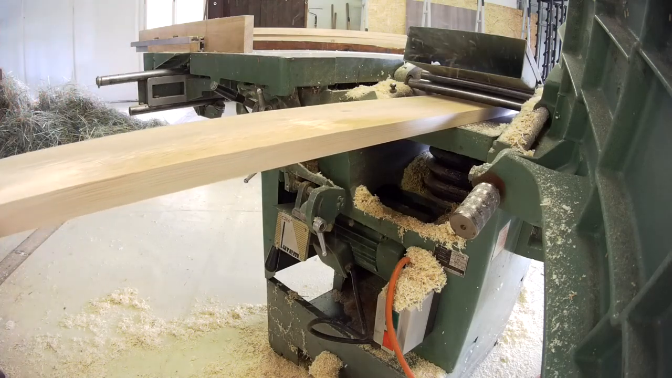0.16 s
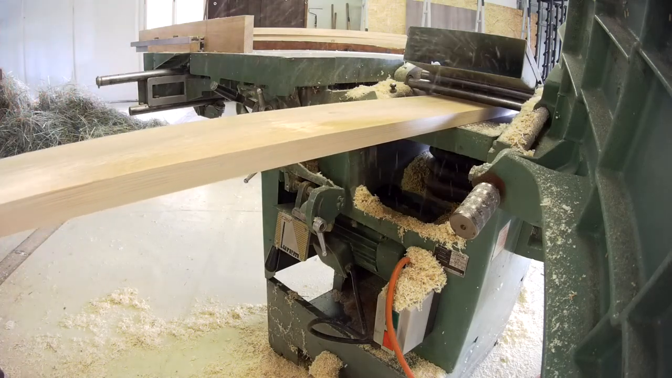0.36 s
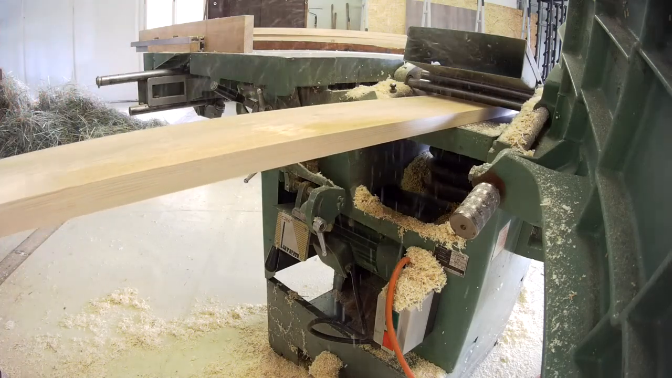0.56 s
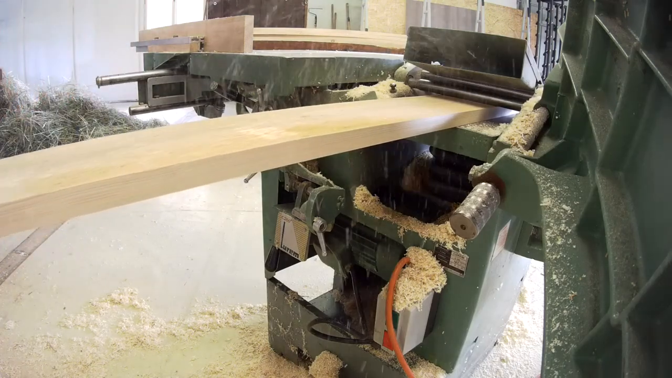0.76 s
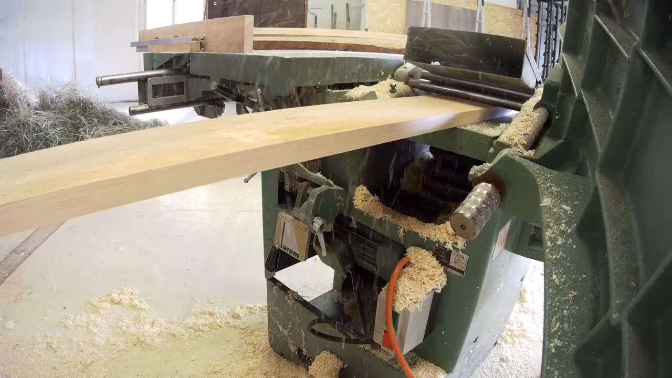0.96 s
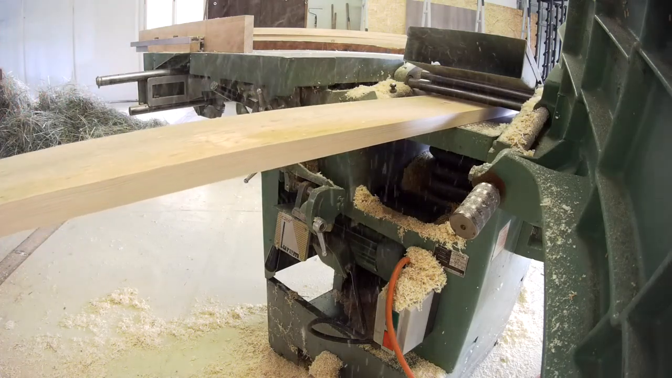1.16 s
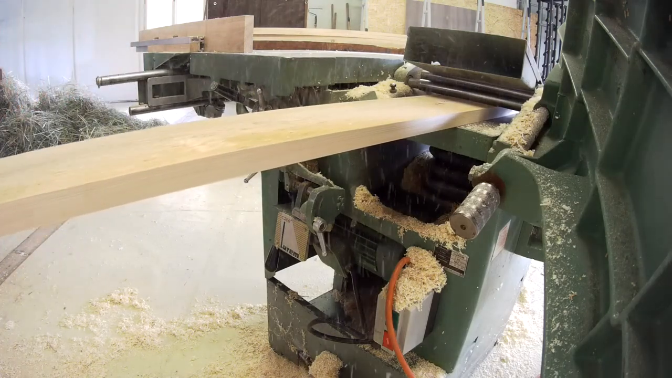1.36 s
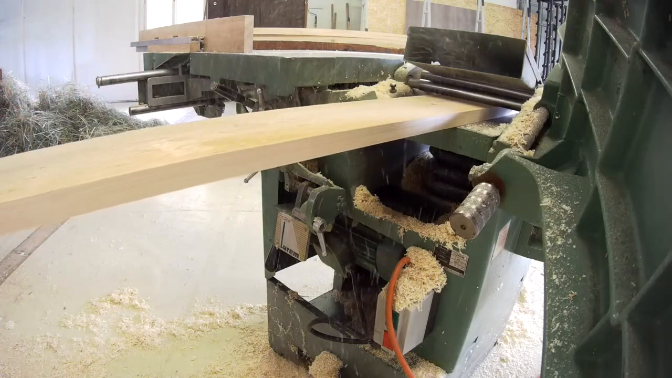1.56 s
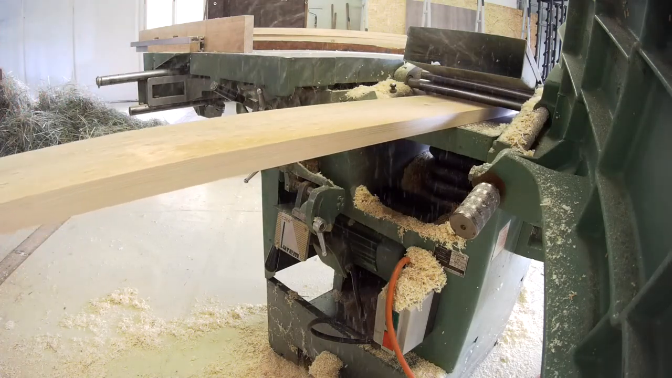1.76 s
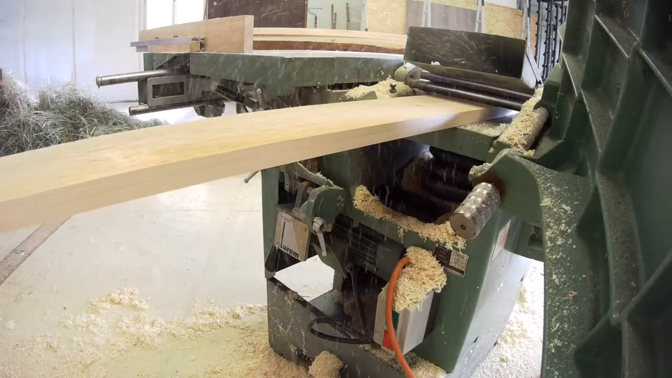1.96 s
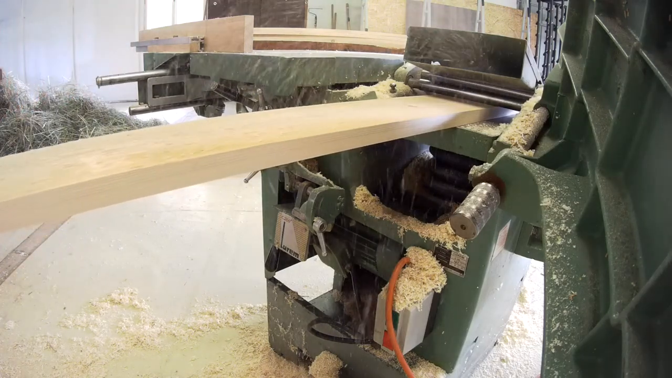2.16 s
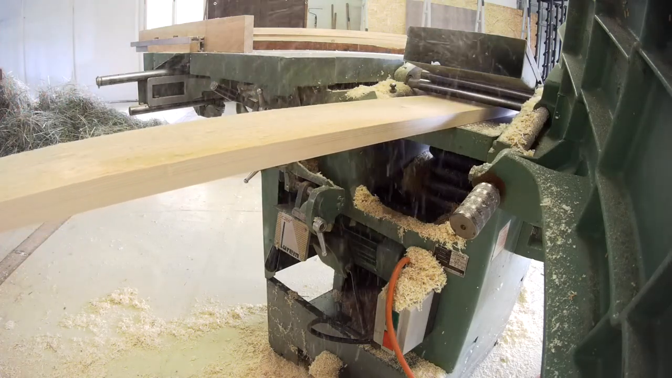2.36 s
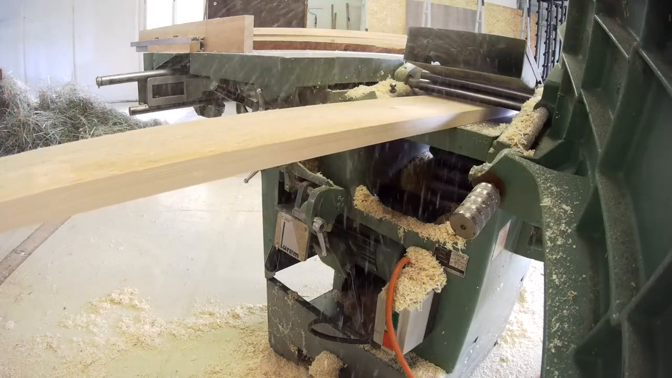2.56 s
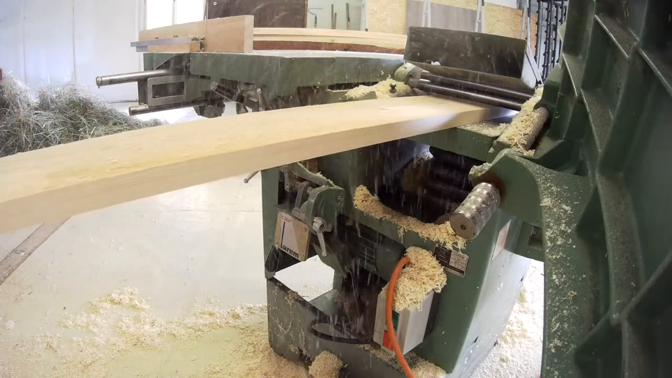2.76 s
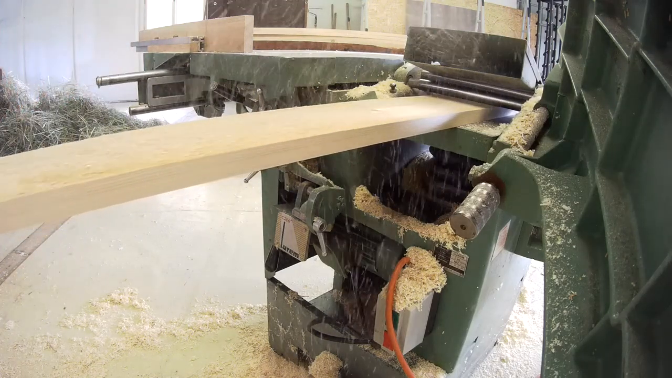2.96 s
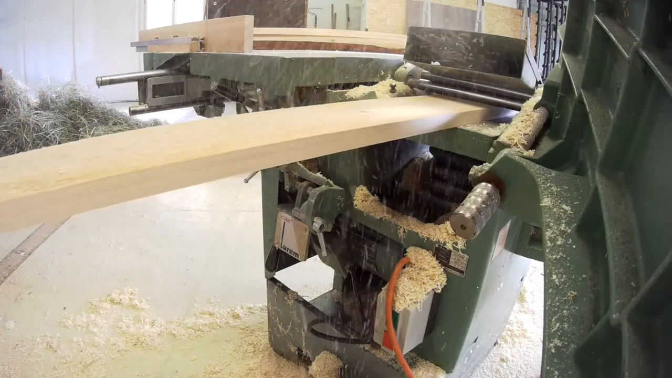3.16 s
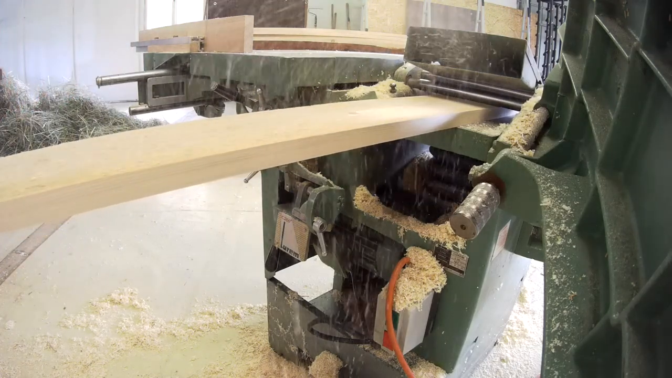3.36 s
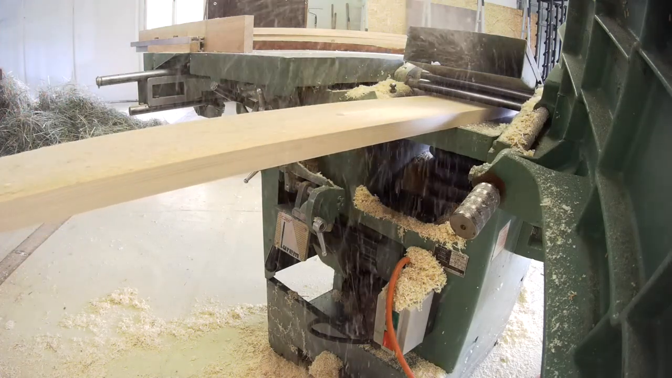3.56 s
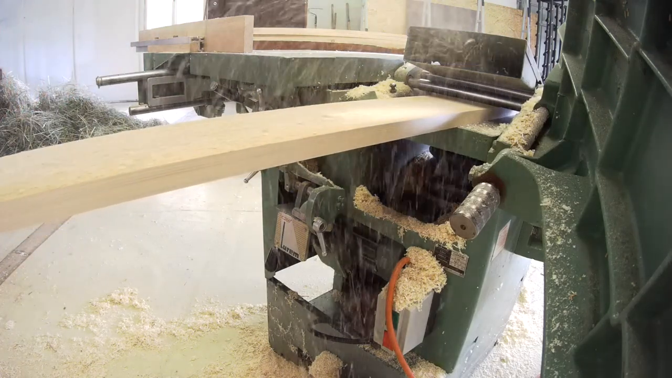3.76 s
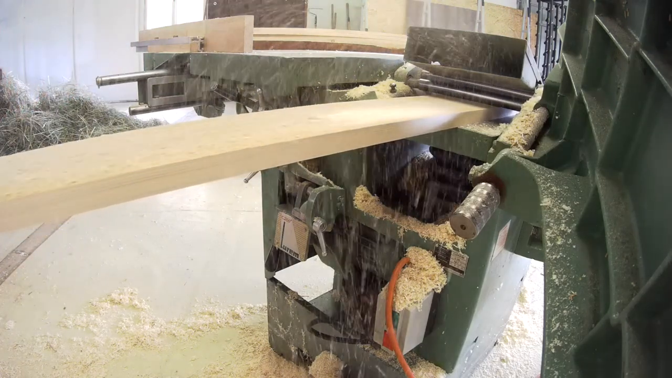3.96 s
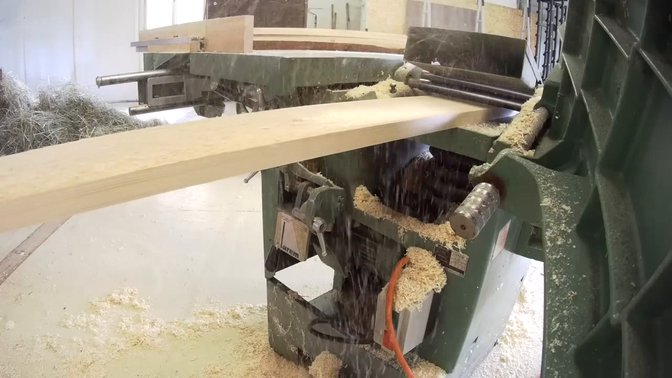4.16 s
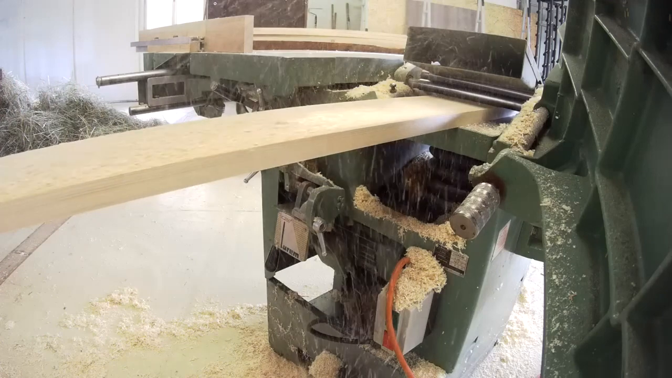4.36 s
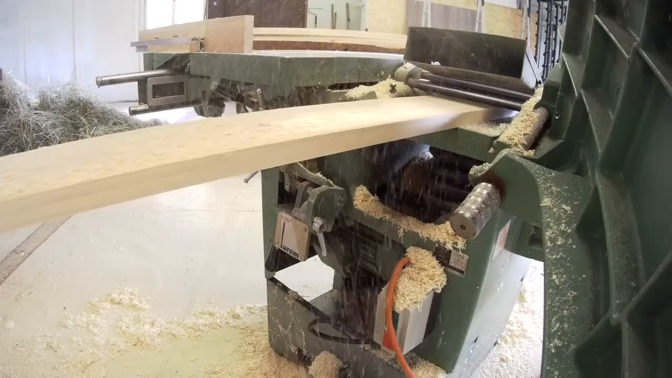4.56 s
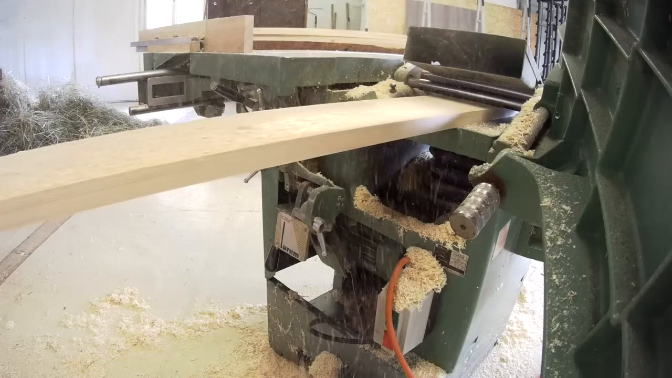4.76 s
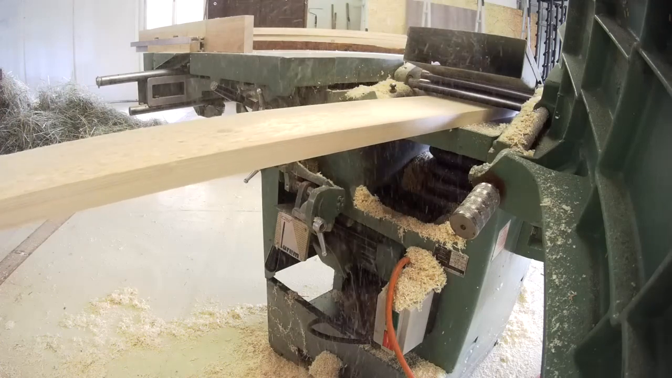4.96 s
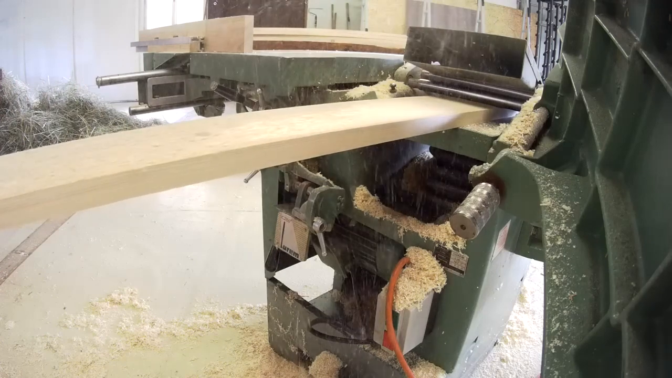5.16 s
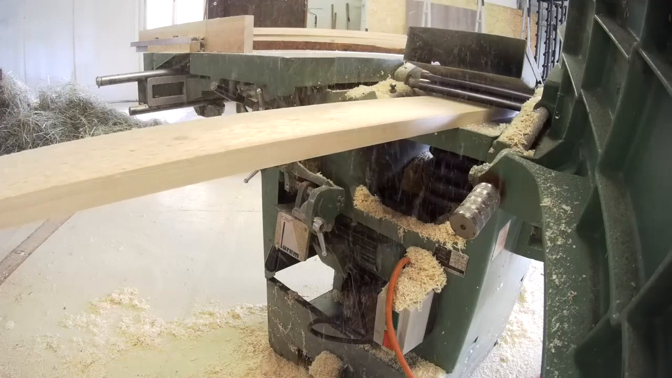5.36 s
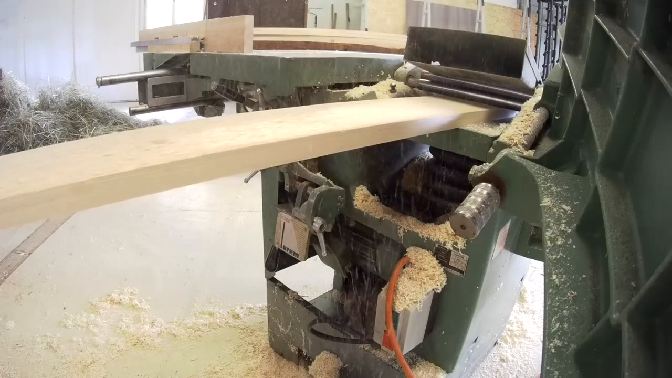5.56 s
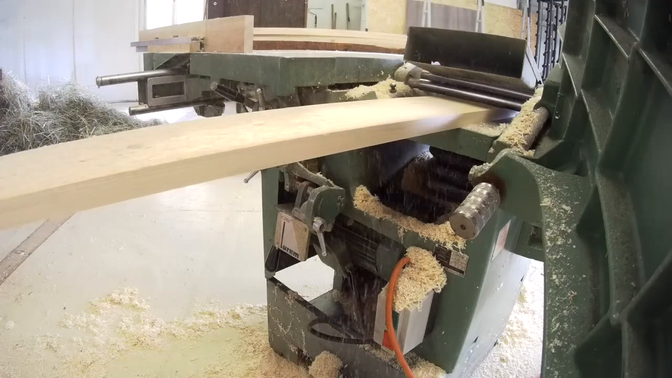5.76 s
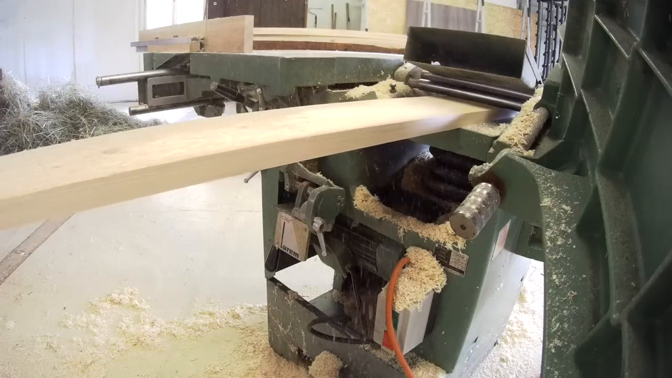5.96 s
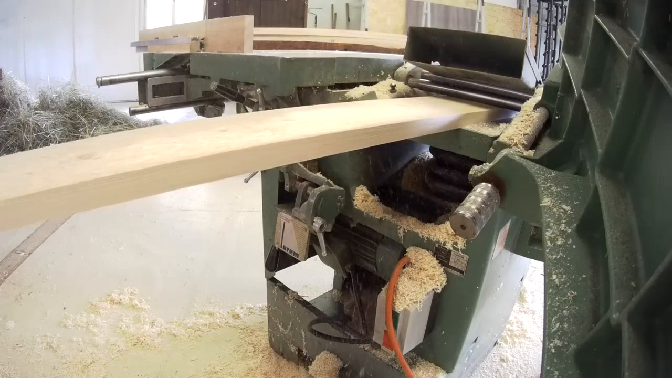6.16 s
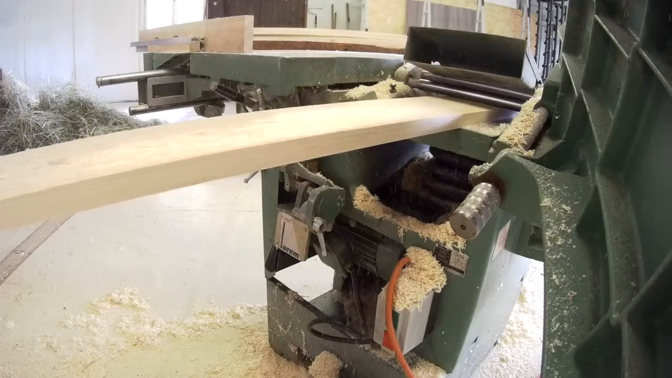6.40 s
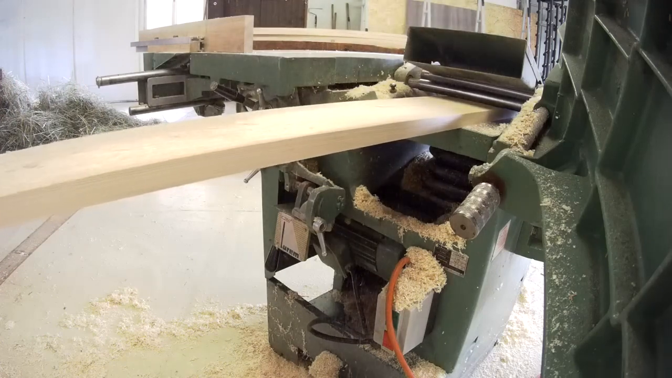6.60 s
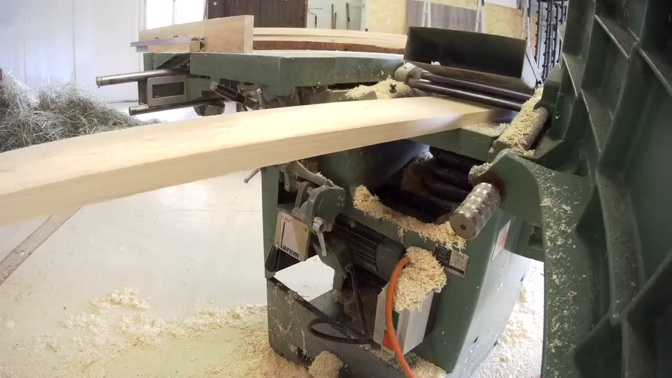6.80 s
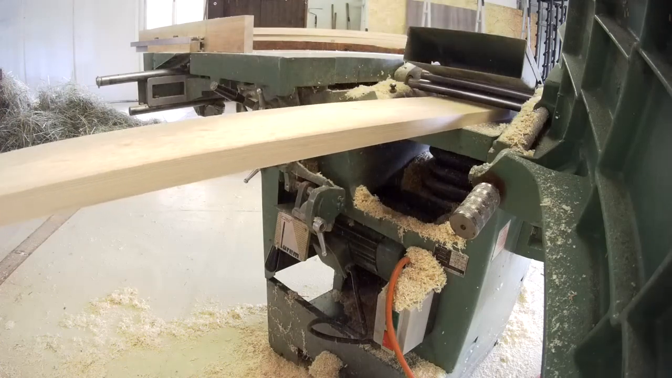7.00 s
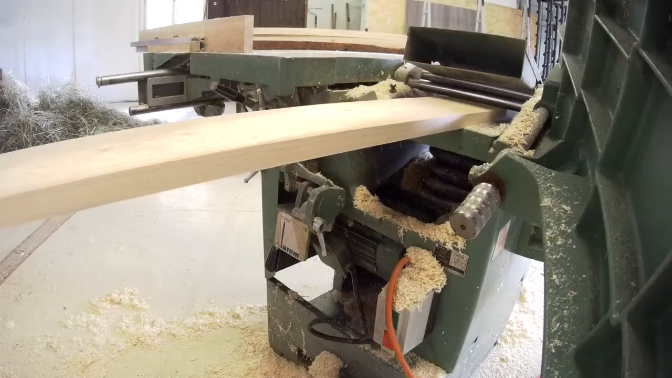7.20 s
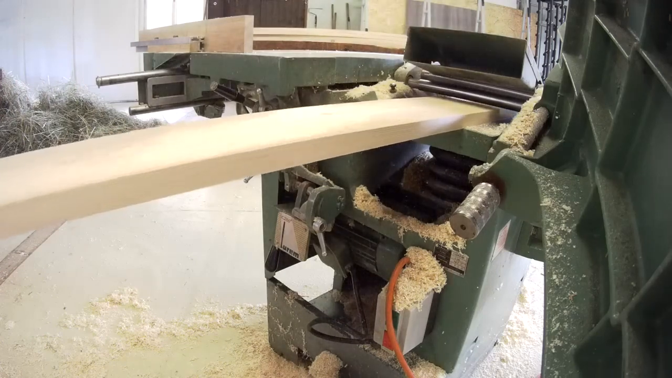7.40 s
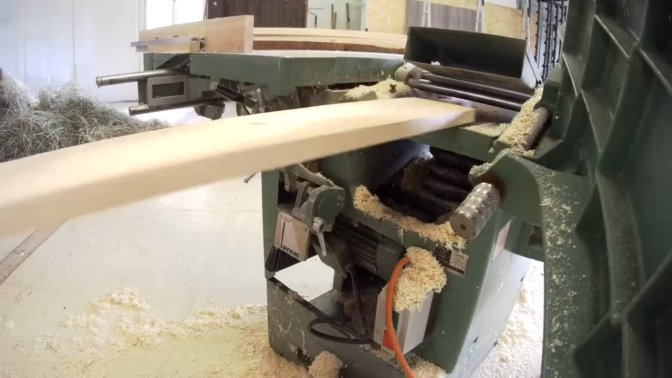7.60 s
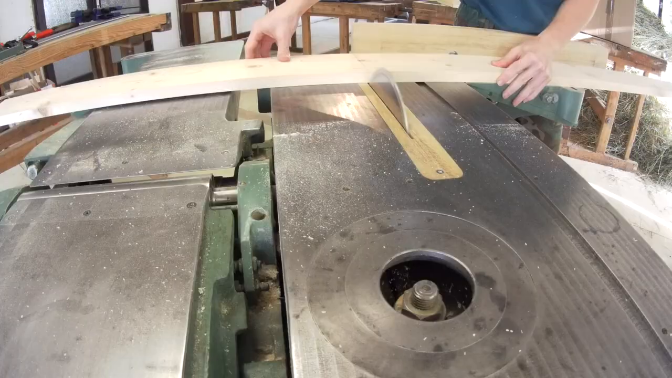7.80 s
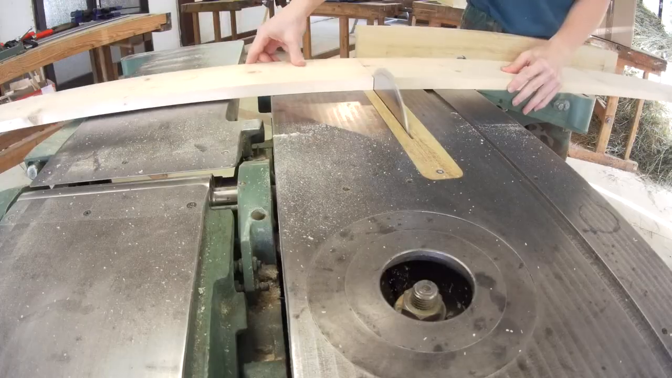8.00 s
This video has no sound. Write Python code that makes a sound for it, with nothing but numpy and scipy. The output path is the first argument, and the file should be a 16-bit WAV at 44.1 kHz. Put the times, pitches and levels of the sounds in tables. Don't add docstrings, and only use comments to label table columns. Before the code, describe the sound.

A thickness planer drones thick and rough as its spinning cutter chews a board, chips hissing, then the cut runs out and it whirs on freely.

```python
import sys
import numpy as np
from scipy import signal
from scipy.io import wavfile
from scipy.ndimage import uniform_filter1d

SR = 44100
rng = np.random.default_rng(int(sys.argv[2]) if len(sys.argv) > 2 else 0)


def waveform_to_disk(signal):
    frames = np.transpose(np.atleast_2d(signal))
    scaled = np.clip(frames, -1, 1) * 32767
    samples = np.round(scaled).astype(np.int16)
    wavfile.write(sys.argv[1], SR, samples)


def ratio(d):
    e = np.asarray(d, float) / 20
    return 10 ** e


N = 354560

# f/Hz, level/dB per Hz
WIND = [(15, -32), (35, -23), (75, -27.5), (150, -10), (300, -9), (550, -4), (1000, -3.5), (1500, -5.5),
        (2200, -8.5), (2800, -21), (5000, -17), (8500, -33.5), (12000, -43), (14500, -36.5)]
# f/Hz, level/dB
HUMS = [(48.4, -58), (145, -63), (393, -58), (490, -54), (1340, -50), (1117, -52), (1980, -52)]
# f/Hz, width/Hz, level/dB
BELT_RINGS = [(942, 140, -42.5), (1023, 55, -38.5), (2108, 170, -45.5), (3055, 150, -52.5),
              (4063, 240, -50), (4290, 320, -55), (4946, 330, -64), (5190, 34, -58.5), (5490, 250, -58),
              (6453, 680, -53), (7830, 580, -53.5), (9105, 200, -55), (1090, 40, -49), (975, 25, -50)]
# f/Hz, level/dB per Hz
CHIP_HISS = [(300, 2), (800, -74), (2000, -21), (4200, 3), (7000, .5), (10000, -3), (14000, -45.5)]
# t/s, level/dB
DEPTH = [(0.0, -57), (0.02, -60), (0.3, -56), (1.37, -57), (1.96, -54.5), (2.18, -55), (2.26, -55),
         (2.87, -56), (3.38, -54), (4.68, -58), (4.85, -52.5), (6.03, -64.5), (7.75, -64.5), (7.82, -61.5)]
# t/s, turns f/Hz
SPEED = [(0, 115.28), (0.3, 115.11), (0.9, 115.11), (1.2, 115.24), (2.1, 114.98), (3, 114.95),
         (3.3, 114.81), (3.6, 114.4), (3.9, 115.02), (4.5, 115.32), (4.8, 115.22), (5.1, 115.28),
         (5.7, 115.6), (6.9, 115.77), (7.83, 115.73)]
# level in the cut/dB, running free/dB, change t/s
KNIFE_TONES = [(-34.5, -36.5, 0.19), (-34.5, -36, 0.26), (-33, -35.5, 0.23), (-28.5, -49, 1.95),
               (-40, -55, 0.46)]
SWELL_ORDERS = (1, 18, 21, 33, 36)
# level in the cut/dB, running free/dB, change t/s
SWELL_TONES = [(-55, -54, 0.41), (-44.5, -50, .9), (-45.5, -60.5, 0.26), (-42, -76, 0.22),
               (-41.5, -52, 0.26)]
UNBALANCE_ORDERS = (2, 4, 5, 7, 8, 10, 11, 17)
# level in the cut/dB, running free/dB, change t/s
UNBALANCE = [(-50.5, -53.5, .5), (-48.5, -46.5, .5), (-47.5, -49.5, .5), (-42, -46.5, .5), (-49, -47, .5),
             (-53.5, -63, .5), (-51, -81, .5), (-46.5, -46.5, .5)]
# f/Hz, level of a line/dB
BITE = [(1500, -51), (2300, -50), (2600, -55), (2880, -58), (3020, -54), (3300, -57), (3700, -52.5),
        (4000, -48), (4300, -50), (4700, -55), (5400, -56), (6000, -60), (6600, -60), (7300, -67)]
BITE_STARTS = (13, 26, 40, 51, 72)
# level in the cut/dB, running free/dB, change t/s
BITE_REGIONS = [(0.5, -7.5, 0.18), (3, -12, 0.083), (-2.5, -21, 0.65), (0.2, -11.5, 0.26)]
# t/s, length/s, f/Hz, lift level/dB
BOARD = [(0.05, 1.3, 4840, -3), (0.15, 0.31, 2360, -27), (0.4, 0.37, 3440, 8.5), (0.4, 0.27, 3850, -3),
         (0.45, 0.83, 5120, 8.5), (0.55, 0.4, 5460, -7.5), (0.75, 0.28, 2820, 8.5),
         (0.8, 0.55, 6760, -11.5), (0.95, 1.84, 3100, -4), (1.5, 1.5, 2344, 9.5), (1.8, 0.27, 5423, 12),
         (1.8, 0.22, 3950, -14.5), (1.8, 1.5, 1956, 6), (2.35, 0.21, 4980, 15), (2.55, 0.27, 5640, -16.5),
         (2.65, 0.27, 2220, 8.9), (2.65, 0.27, 2470, -10), (3.2, 0.19, 4600, 9), (3.85, 1.3, 4797, -9.5),
         (4.0, 1.3, 4490, -4), (4.1, 1.1, 2946, -11), (4.35, 2.1, 2650, -13), (4.5, 0.99, 2160, -9.5),
         (4.55, 0.72, 4130, 4.5), (4.8, 0.44, 2470, -10.6), (5.05, 0.74, 6640, -20),
         (6.25, 1.3, 1940, -12.5), (6.3, 0.9, 4180, -7.5)]
# t/s, length/s, f/Hz, lift level/dB
HOOD = [(0.05, 0.32, 1038, -3), (0.05, 0.4, 1499, -14), (0.55, 0.23, 1844, -13), (0.9, 0.14, 1700, -5),
        (1.05, 1.3, 1250, 9), (1.25, 0.24, 1520, 11.5), (1.25, 0.4, 576, 5.5), (1.3, 0.26, 1268, -15),
        (1.3, 1.04, 115, 5.5), (1.5, 0.43, 692, 3), (1.7, 0.34, 1833, -16), (2.25, 1.4, 1614, 8.8),
        (2.6, 2.1, 1153, 7.5), (2.8, 0.44, 1729, -6), (3.0, 0.36, 346, -4), (3.0, 1.2, 692, -4),
        (3.0, 1.1, 917, 6.5), (3.2, 0.74, 1038, 5), (4.45, 0.4, 1038, -3), (4.65, 0.95, 1480, -3),
        (5.05, 1, 1850, -17), (5.2, 0.28, 113.4, -14), (5.4, 0.29, 922, -7), (5.5, 1.3, 1729, 3),
        (6.4, 0.4, 680, -12), (6.75, 0.27, 1038, 4.5), (7.25, 0.27, 692, 3), (7.65, 0.17, 1038, -5.6)]
# t/s, length/s, f/Hz, lift level/dB
LIFTS_AND_DIPS = [(3.6, 0.083, 1383, -8), (3.63, 0.036, 1729, 8), (3.65, 0.11, 346, 2.5), (3.75, 0.049, 692, 5),
                  (8.1, 0.11, 346, 4), (6.7, 0.16, 1383, -5), (7, .2, 346, -1.5), (5.25, 0.18, 6900, 13.5),
                  (1.32, .6, 346, 2), (0.32, 0.37, 2190, -7), (1.6, 1, 2997, 7), (2.05, 0.14, 6570, 12),
                  (3.3, .27, 3458, -8), (3.75, .18, 3900, 7.5), (3.85, .18, 4300, -10), (3.3, 0.34, 6500, 7.5),
                  (6.75, 0.069, 692, -6), (7.9, .9, 2075, -11), (.55, .15, 1383, 2), (3.3, .35, 3950, 8),
                  (.05, 0.11, 346, -4.5), (4.95, .4, 5350, 11), (3.8, .1, 2075, 5.5), (.8, 0.14, 1038, 2.5),
                  (2.6, 0.32, 115, -9.5)]
# lower edge f/Hz, most peakiness that passes as noise
NOISY_TREBLE = [(4600, .45), (5100, .36), (5600, .58), (6200, 0.52), (6800, 0.67), (7500, 0.66),
                (8200, 1.1), (9000, 0.83), (9700, 1.2), (11000, 1.3), (12000, 1.3), (12750, 1.3),
                (13500, 1.3), (14250, 1.3)]
# lower edge f/Hz, least level against the usual/dB
TOP_BANDS = [(12750, -9), (13500, -1.5), (14250, 4), (14500, 9), (15200, 99)]

KNIVES, PULLEY_COGS, BELT_COGS = 3, 9, 81
RIPPLE_TURNS, BELT_SLIP = .0012, .0045
CUT_ENDS_S = 5.337
WIND_DB = -38.5
HISS_DB, HISS_FOLLOWS, USUAL_DEPTH_DB = -50, 1.2, -58.5
BITE_WANDER_DB = 1.0
HOOD_WIDTH, BOARD_WIDTH = .03, .04
OVERLOAD, OFFSET, KNEE = .106, .0005, 7
END_S, FADE_S = 7.8342, .0006


def rms_one(x):
    return x / np.sqrt(np.mean(x ** 2) + 1e-20)


def in_time(rows):
    s, *columns = np.transpose(rows)
    return [np.interp(np.arange(N) / SR, s, c) for c in columns]


def at_hz(points, hz):
    f, level = np.transpose(points)
    return np.interp(np.log(hz), np.log(f), level)


def drift(rate):
    r = np.exp(-128 * np.pi * rate / SR)
    sparse = rng.standard_normal(N // 64 + 2002)
    slow = signal.lfilter([1], [1, -2 * r, r * r], sparse)[2000:]
    return np.interp(np.arange(N) / 64, np.arange(len(slow)), rms_one(slow - slow.mean()))


def resonance(x, hz, width_hz):
    r = np.exp(-np.pi * width_hz / SR)
    poles = [1, -2 * r * np.cos(2 * np.pi * hz / SR), r * r]
    return signal.lfilter([(1 - r * r) / 2, 0, (r * r - 1) / 2], poles, x)


def coloured(spectrum, patchy_db):
    out = 0
    edges = 11.5 * 2 ** np.arange(0, 10.6, .5)
    white = rng.standard_normal((2, N))
    for k, (low, high) in enumerate(zip(edges, edges[1:])):
        bandpass = signal.butter(2, [low, high], "band", fs=SR, output="sos")
        band = signal.sosfilt(bandpass, white[k % 2])
        out = out + band * ratio(at_hz(spectrum, np.sqrt(low * high)) + patchy_db * drift(11.0))
    return rms_one(out)


def tone(turns, order, level_db, wander_db, wander_rad, rate):
    height = np.sqrt(2) * ratio(level_db + wander_db * drift(rate))
    return height * np.cos(2 * np.pi * order * turns + wander_rad * drift(rate))


def running_out(in_cut_db, free_db, change_s):
    freed = np.clip((np.arange(N) / SR - CUT_ENDS_S) / change_s, 0, 1)
    return in_cut_db + (free_db - in_cut_db) * freed


def board_db(order):
    t, lift_db = np.arange(0, N / SR, .01), 0
    for rows, width in ((HOOD, HOOD_WIDTH), (BOARD, BOARD_WIDTH), (LIFTS_AND_DIPS, HOOD_WIDTH)):
        s, length, hz, db = np.transpose(rows)
        near = db * np.exp(-(np.log(order * SPEED[0][1] / hz) / width) ** 2)
        lift_db = lift_db + np.exp(-((t[:, None] - s) / length) ** 2) @ near
    return np.interp(np.arange(N) / SR, t, lift_db)


def shaft():
    turns = np.cumsum(in_time(SPEED)[0]) / SR
    loops = (1 + BELT_SLIP) * turns * PULLEY_COGS / BELT_COGS
    return turns + RIPPLE_TURNS * np.sin(2 * np.pi * loops)


def wind():
    return ratio(WIND_DB) * coloured(WIND, patchy_db=1.8)


def motor():
    t = np.arange(N) / SR
    return sum(tone(hz * t, order=1, level_db=db, wander_db=0.67, wander_rad=0.3, rate=0.85)
               for hz, db in HUMS)


def belt(turns):
    cogs = PULLEY_COGS * turns
    at = np.flatnonzero(np.diff(np.floor(cogs)))
    which = np.floor(cogs[at + 1]).astype(int) % BELT_COGS
    loop = 2 * np.pi * which / BELT_COGS
    out = 0
    for hz, width_hz, db in BELT_RINGS:
        passing = loop - 1.9 + 0.97 * rng.standard_normal() + .5 * drift(1.7)[at]
        throb_db = 3.5 * np.cos(passing) + 2.0 * np.cos(3 * passing) + 1.2 * drift(24)[at]
        worn = rng.standard_normal(BELT_COGS)[which] + 0.8 * rng.standard_normal(len(at))
        slaps = np.full(N, 1e-18)
        slaps[at] = worn * ratio(throb_db)
        ring = resonance(resonance(slaps, hz, width_hz), hz, 2 * width_hz)
        out = out + ratio(db) * rms_one(ring)
    return out


def chips(turns):
    hiss_db = HISS_DB + HISS_FOLLOWS * (in_time(DEPTH)[0] - USUAL_DEPTH_DB)
    knife_db = 2.0 * np.cos(2 * np.pi * KNIVES * turns)
    deepest_db = 2.3 * np.cos(2 * np.pi * turns)
    bursts = ratio(knife_db + deepest_db + 0.57 * drift(3.6))
    hiss = rms_one(bursts * coloured(CHIP_HISS, patchy_db=0.5))

    sizes = ratio(3.7 * np.minimum(rng.exponential(1, N), 5)) * rng.choice([-1, 1], N)
    ticks = sizes * (rng.random(N) < 2500 * ratio(4.0 * drift(18)) / SR)
    hood = signal.butter(2, [7500, 15000], "band", fs=SR, output="sos")
    ticks = rms_one(signal.sosfilt(hood, ticks))
    return ratio(hiss_db + 5.0) * hiss + ratio(hiss_db - 7.5) * ticks


def cutter_air(turns):
    out = 0
    for k, row in enumerate(KNIFE_TONES):
        order = KNIVES * (k + 1)
        level_db = 2.0 + running_out(*row) + board_db(order)
        out = out - tone(turns, order, level_db, 0.21, 0.54, 1.84)
    for order, row in zip(SWELL_ORDERS, SWELL_TONES):
        level_db = 2.0 + running_out(*row) + board_db(order)
        out = out + tone(turns, order, level_db, 0.27, 0.57, 2.6)
    for order, row in zip(UNBALANCE_ORDERS, UNBALANCE):
        out = out + tone(turns, order, running_out(*row) + board_db(order), 0.52, 0.73, 0.88)
    return out


def bite(turns):
    out = 0
    for first, last, row in zip(BITE_STARTS, BITE_STARTS[1:], BITE_REGIONS):
        region_db = running_out(*row)
        arrival = turns + .011 * (first - 26) + .002 * drift(.8) + .0004 * drift(25)
        for order in set(range(first, last)) - {15, 17, *SWELL_ORDERS}:
            every_knife_db = 7.5 * (order % KNIVES == 0)
            line_db = at_hz(BITE, order * SPEED[0][1]) + every_knife_db - 0.3
            level_db = line_db + region_db + board_db(order)
            out = out + tone(arrival, order, level_db, BITE_WANDER_DB, 0.67, 0.77)
    leaving_db = -12 * np.clip((np.arange(N) / SR - 5.6) / 0.83, 0, 1)
    return ratio(leaving_db) * out


def scene():
    turns = shaft()
    machine = wind() + motor() + belt(turns)
    cutter = chips(turns) + cutter_air(turns) + bite(turns)
    return np.stack([machine + cutter] * 2)


def diffuse_treble(mono):
    hz, _, frames = signal.stft(mono, SR, "cosine", 2048)
    power, sides = np.abs(frames) ** 2 + 1e-20, np.stack([frames, frames])
    fresh = signal.stft(rng.standard_normal((2, N)), SR, "cosine", 2048)[2]
    steady = rng.random(len(frames[0])) > .27
    steady |= ~np.roll(steady, 1)
    coarse = ratio(0.95 * rng.standard_normal(len(frames[0])))
    for (low, most), (high, _) in zip(NOISY_TREBLE, NOISY_TREBLE[1:]):
        band = (hz >= low) & (hz < high)
        level = power[band].mean(0)
        peakiness = np.log(level) - np.log(power[band]).mean(0)
        peakiness = uniform_filter1d(peakiness, size=2)
        fresh_level = np.mean(np.abs(fresh[:, band]) ** 2, axis=1)
        fill = coarse * fresh[:, band] * np.sqrt(level / fresh_level)[:, None]
        sides[:, band] = np.where(steady & (peakiness < most), fill, frames[band])
    top = coarse ** 2 * power[(hz > 12750) & (hz < 14250)].mean(0)
    for low, least_db in TOP_BANDS:
        sides[:, hz >= low] *= top > ratio(2 * least_db) * np.median(top)
    return signal.istft(sides, SR, "cosine", 2048)[1][:, :N]


def top_cut(x):
    return signal.sosfilt(signal.butter(12, 14860, fs=SR, output="sos"), x)


def record(dry):
    drive = dry[0] / OVERLOAD
    mono = OVERLOAD * drive / (1 + np.abs(drive) ** KNEE) ** (1 / KNEE) + OFFSET
    mono = signal.sosfiltfilt(signal.butter(6, 13600, fs=SR, output="sos"), mono)
    ending = np.clip((END_S - np.arange(N) / SR) / FADE_S, 0, 1)
    return top_cut(diffuse_treble(mono) * ending)


dry = scene()
out = record(dry)
waveform_to_disk(out)
```